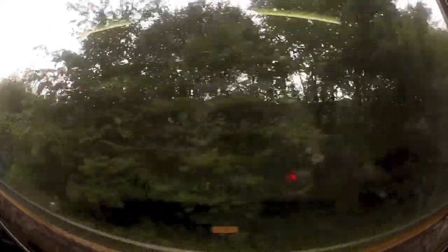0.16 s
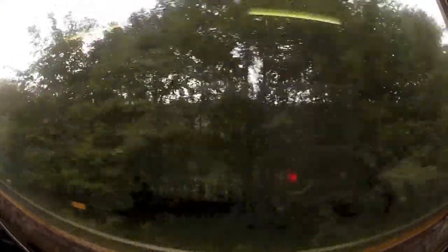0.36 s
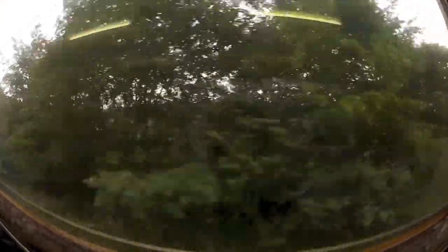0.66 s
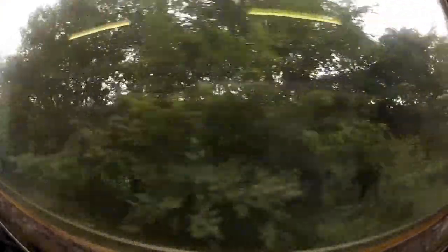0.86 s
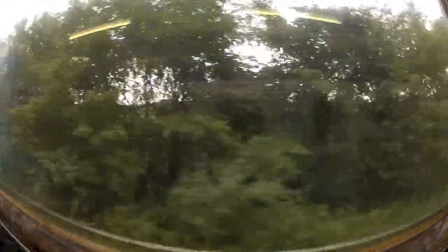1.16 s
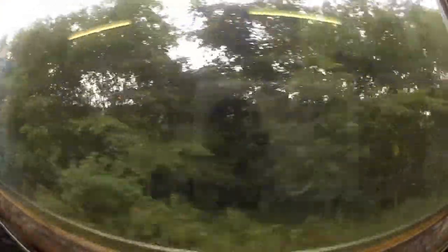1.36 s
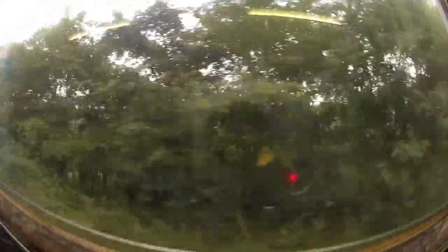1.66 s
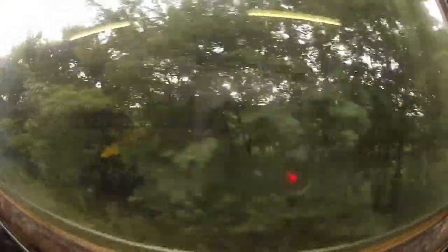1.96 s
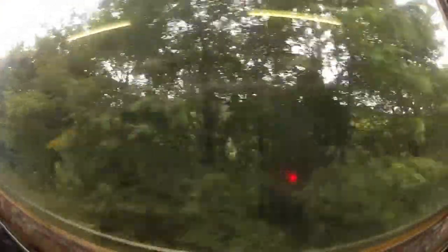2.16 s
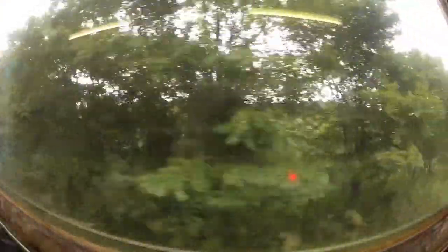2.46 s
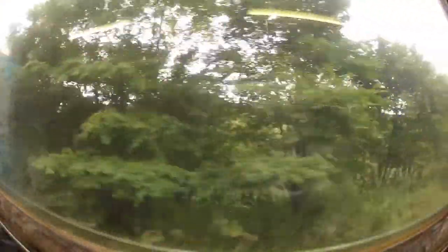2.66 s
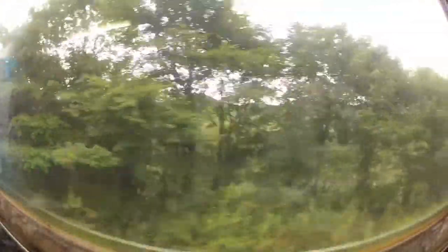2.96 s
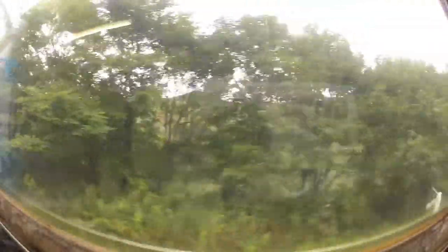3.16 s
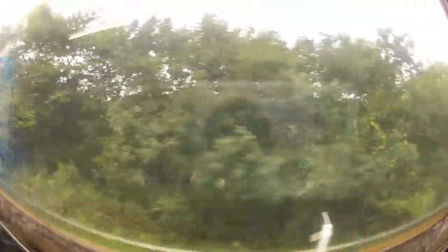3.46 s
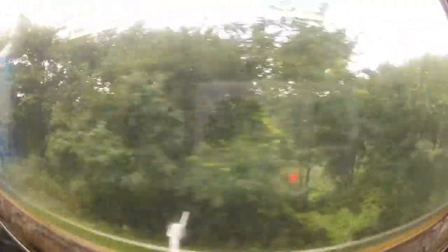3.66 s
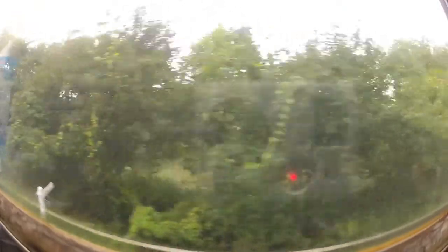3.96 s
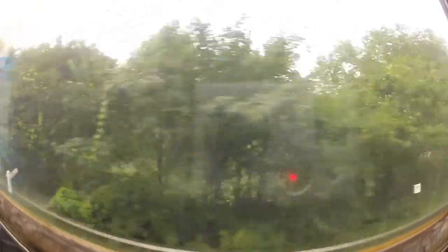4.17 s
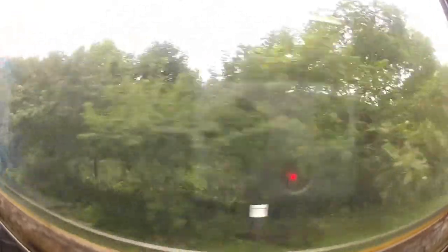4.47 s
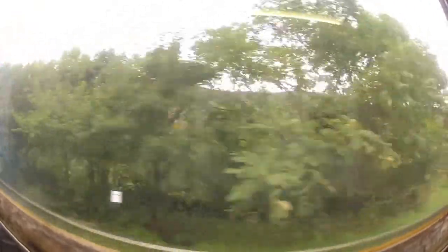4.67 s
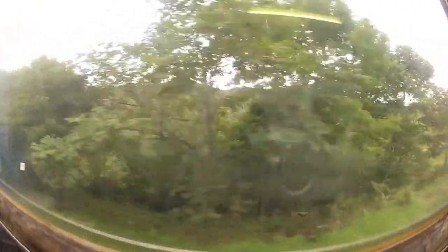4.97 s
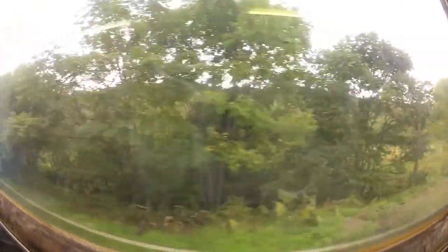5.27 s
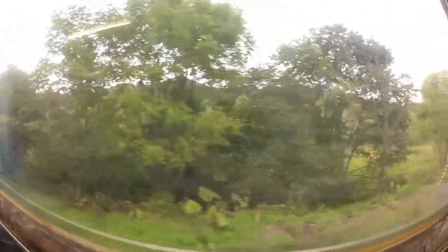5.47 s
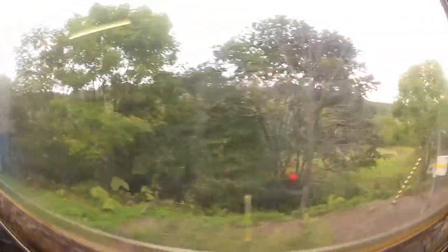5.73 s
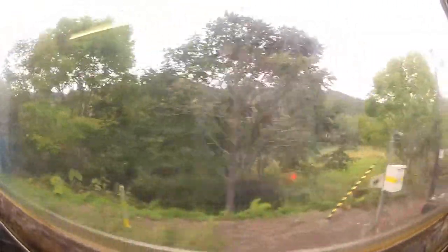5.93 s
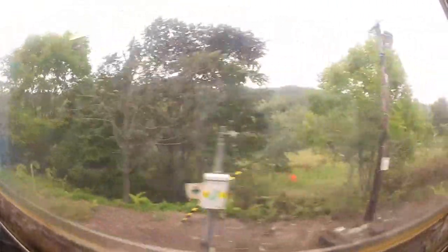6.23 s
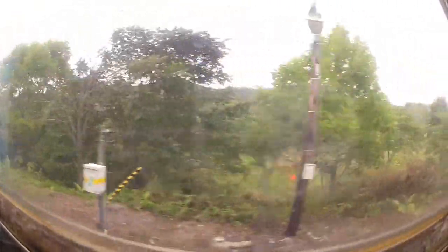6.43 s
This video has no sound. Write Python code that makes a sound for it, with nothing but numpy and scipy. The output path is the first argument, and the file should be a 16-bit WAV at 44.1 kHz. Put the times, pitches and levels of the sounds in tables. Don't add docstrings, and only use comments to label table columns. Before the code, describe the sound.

Inside a slowing diesel railcar, deep wheel rumble booms through the cabin, with humming rails, dull joint thuds and a few small plastic ticks.

```python
import sys
import numpy as np
from scipy import signal
from scipy.fft import rfft, irfft, next_fast_len
from scipy.io import wavfile
from scipy.ndimage import uniform_filter1d

SR = 44100
rng = np.random.default_rng(int(sys.argv[2]) if len(sys.argv) > 2 else 0)


def wav_record(signal):
    frames = np.transpose(np.atleast_2d(signal))
    bounded = np.clip(frames, -1, 1)
    quanta = np.round(bounded * 32767).astype(np.int16)
    wavfile.write(sys.argv[1], SR, quanta)


def volts_from_decibels(level):
    exponent = np.asarray(level, float) / 20
    return 10 ** exponent


N = 291060
SIZE = next_fast_len(N)
HZ = np.maximum(np.fft.rfftfreq(SIZE, 1 / SR), 1)

PATH_HZ = [50, 105, 450, 2000]
# f/Hz, level/dB per Hz
RUMBLE = [(12, -40.5), (20, -26), (63, -20.5), (129, -9), (206, 2.5), (287, -10.5), (582, -22.5),
          (640, -21), (933, -33), (1100, -35.5), (1240, -38.5), (2340, -49), (3840, -48), (4750, -49.5),
          (5600, -52), (7280, -59.5), (12300, -120)]
# f/Hz, width/Hz, level/dB
TRIM_MODES = [(48, 10, -0.5), (66, 3.6, 3.5), (97, 8.4, -1), (516, 18, 3.5), (628, 11, 1), (1094, 130, 2.5),
              (1584, 74, 2.5), (2830, 690, 2.5)]
# f/Hz, width/Hz, level/dB
AIR_MODES = [(135.5, 11, -9), (152.1, 8.9, -2.5), (169.9, 7, -1)]
# f/Hz, width/Hz, level/dB
PANEL_MODES = [(200.9, 18, -4.5), (216.7, 8.5, -12)]
# f/Hz, width/Hz, level/dB
GLASS_MODES = [(242.5, 21.4, 3.5), (273.6, 24, -6.5), (305.8, 25.3, -3.5)]
# t/s, f/Hz
SPEED = [(0, 126), (1.45, 126.5), (1.9, 116.9), (2.15, 101.5), (2.7, 98.8), (3.05, 91), (3.8, 90.7),
         (4.5, 79.91), (6.6, 66)]
# t/s, level/dB re average
ROUGHNESS = [(0, 1.3), (.3, -0.4), (1.02, 0.4), (1.16, 1.5), (1.4, 0.6), (1.55, -0.5), (2.1, 0.9), (2.8, 0),
             (2.9, 2.7), (3.3, 0.3), (4.2, -1.4), (4.45, 0.5), (4.69, -1.5), (5.02, -0.5), (5.4, -1.4),
             (5.88, -1.2), (6.05, 1.5), (6.6, 1)]
# t/s, peak level/dB, 10 dB fall/s
LURCHES = [(.4, -31, 1.5), (.93, -26, -0.1), (1.22, -29, -0.8), (1.4, -28, -0.5), (1.8, -34, -1.5),
           (2.1, -29, -0.5), (2.5, -33, -1), (2.93, -21, 0.17), (3.08, -24, -0.1), (3.33, -30, 0),
           (3.6, -32, 0.1), (3.92, -26, .1), (4.2, -32, 0.2), (4.57, -32, .06), (4.93, -28, 0.05),
           (5.1, -21.5, -0.03), (5.3, -31, 0.3), (5.79, -29.5, 0.12), (5.98, -23.5, 0.08), (6.39, -28, .15)]
# t/s, peak level/dB, 10 dB fall/s
SHUDDERS = [(0.062, -32, 1.5), (0.271, -31, 0.3), (0.464, -34, 0.9), (0.572, -30.5, 0.133),
            (0.695, -31.0, -0.2), (0.948, -25.5, 0.1), (1.112, -27.5, 0.2), (1.423, -28.5, 0),
            (1.555, -24.0, 0.075), (1.637, -28, 0.2), (1.764, -21.5, 0.15), (1.88, -22.5, 0.23),
            (2.079, -22, 0.27), (2.183, -20, 0.22), (2.361, -22.0, 0.23), (2.526, -24.5, 0.16),
            (2.637, -26.5, 0.27), (3.064, -20, 0.14), (3.266, -25.5, 0.14), (3.519, -25.5, 0.2),
            (3.663, -27, 0.13), (3.932, -31, 0), (4.027, -32.5, 0), (4.298, -31.0, 0.1), (4.575, -32, 0.15),
            (4.79, -30.5, 0.2), (4.919, -29.5, 0.2), (5.068, -24, 0.12), (5.327, -28, 0.15),
            (5.489, -30, 0.122), (5.769, -29.5, 0.05), (5.961, -29.0, 0.2), (6.125, -32, 0.15),
            (6.282, -33.0, 0.127), (6.371, -32.0, 0.3), (6.494, -38, 0.3)]
# t/s, peak level/dB, 10 dB fall/s
ROARS = [(.12, -40, 0.2), (.42, -38, 0.8), (.62, -33.5, 0.15), (.92, -38, .06), (1.16, -34, 0.28),
         (1.38, -31.5, 0.12), (1.49, -43.5, 0.15), (1.57, -35.5, 0.4), (1.79, -34, -0.1), (2.22, -37, -0.6),
         (2.45, -36, 0.65), (2.72, -41, -0.2), (2.95, -37.5, 0.15), (3.3, -40, 0.2), (3.52, -36, .06),
         (3.9, -38, 1), (4.25, -38.5, 0.55), (4.47, -40, 0.14), (4.8, -31.5, 0.03), (5.03, -34, 0.13),
         (5.3, -36, 0.34), (5.79, -35.5, 0.35), (6.01, -44, 0.2), (6.16, -39.5, 0.5), (6.3, -36, -0.1),
         (6.42, -42, 0.6), (6.53, -35, .08)]
# t/s, peak level/dB, 10 dB fall/s
RIPPLES = [
    (1.56, -27, -0.1),
    (1.88, -21, 0.17),
    (2.17, -23.5, 0.26),
    (2.7, -25, -0.2),
    (3.08, -18, 0.1),
    (3.3, -33.5, 0.7),
]
# t/s, peak level/dB, 10 dB fall/s, f/Hz
BOOMS = [(0.04, -13.5, 0.05, 157), (0.11, -14.5, 0.074, 151), (0.212, -14.5, 0.04, 158),
         (0.32, -17.5, 0.1, 155), (0.504, -24, 0, 156), (0.585, -17, 0.15, 156), (0.754, -19, 0.093, 157),
         (0.985, -22, 0.05, 149), (1.104, -12.5, 0.061, 157), (1.317, -4.5, 0.078, 155),
         (1.448, -9.0, 0.058, 155), (1.503, -9.5, 0.061, 154), (1.666, -18.5, 0.04, 150),
         (1.725, -19.5, 0.087, 150), (1.818, -14, 0.02, 157), (1.961, -24, 0.061, 149),
         (2.077, -19, 0.06, 151), (2.131, -18.5, 0.075, 154), (2.333, -17.5, 0.063, 148),
         (2.436, -21, 0.065, 151), (2.514, -23.5, 0.04, 161), (2.632, -22, 0.114, 161),
         (2.832, -25, 0.03, 161), (2.893, -20, 0.04, 156), (3.038, -16, 0.04, 154),
         (3.158, -20.5, 0.06, 152), (3.354, -23.5, 0.05, 155), (3.539, -23.5, 0.08, 146),
         (3.785, -26.5, 0.02, 149), (3.897, -27.5, 0.04, 162), (3.968, -29, 0.145, 158),
         (4.093, -25.5, 0.145, 156), (4.414, -27.5, 0.03, 156), (4.785, -23.0, 0.054, 142),
         (4.865, -24, 0.078, 161), (4.95, -18.5, 0.061, 154), (5.235, -26, 0.04, 159),
         (5.322, -29.0, 0.061, 151), (5.457, -25, 0.05, 154), (5.561, -24.5, 0.064, 150),
         (5.645, -28, 0.061, 158), (5.747, -21.0, 0.054, 165), (5.951, -26.5, 0.049, 155),
         (6.027, -26.5, 0.071, 158), (6.132, -27, 0.04, 161), (6.197, -28.5, 0.079, 163),
         (6.26, -26.5, 0.15, 158), (6.43, -25.5, 0.061, 164), (6.535, -25.5, 0.075, 166)]
# t/s, peak level/dB, 10 dB fall/s, f/Hz
DRONES = [(0.111, -24, 0.2, 206), (0.31, -23.5, 0.103, 201.8), (0.519, -20, 0.06, 210.3),
          (0.63, -18.5, 0.05, 205), (0.875, -19.5, 0.13, 210.1), (1.094, -19.5, 0.13, 206.8),
          (1.243, -19.5, 0.12, 207.1), (1.342, -17.5, 0.16, 203), (1.548, -25.5, 0.14, 204.6),
          (1.662, -25.5, 0.04, 203), (1.754, -22.5, 0.07, 211), (1.911, -21.5, 0.085, 213.1),
          (2.029, -24.0, 0.15, 210), (2.238, -19.5, 0.03, 202), (2.348, -18.5, 0.136, 202),
          (2.578, -20.5, 0.136, 210.3), (2.702, -24, 0.107, 205), (2.891, -21.5, -0.05, 206),
          (3.095, -21, 0.13, 208), (3.299, -21, 0.113, 213.9), (3.496, -21.5, 0.06, 211),
          (3.673, -21.5, 0.105, 204), (3.87, -19, 0.1, 204.9), (3.984, -28, 0, 214),
          (4.074, -23.0, 0.06, 200), (4.267, -23, 0.074, 203), (4.495, -29.5, 0.14, 206),
          (4.562, -29, 0.129, 212), (4.706, -29.5, 0, 209.9), (4.895, -24.5, 0.05, 206),
          (5.012, -28.5, 0.088, 208), (5.198, -26, 0.114, 204), (5.277, -26, 0.092, 206.2),
          (5.357, -23.0, 0.1, 206), (5.705, -16, 0.097, 205), (5.994, -24.5, 0, 209.1),
          (6.241, -26, 0.06, 202.8), (6.333, -26, 0.04, 207), (6.477, -25, 0.05, 204.7)]
# t/s, peak level/dB, 10 dB fall/s
BUZZES = [(0.081, -26, 0.13), (0.154, -33, 0.4), (0.336, -27.5, 0.081), (0.439, -26.5, 0),
          (0.507, -27.5, 0.1), (0.681, -24.5, 0.04), (0.805, -23.5, 0.07), (0.896, -26.5, 0.08),
          (1.059, -23.0, 0.17), (1.248, -24.5, 0.07), (1.328, -23, 0.134), (1.419, -27, 0.072),
          (1.47, -27, 0.15), (1.642, -31.5, 0), (1.781, -27.5, 0), (1.882, -27, 0.04), (2.004, -28.5, 0.2),
          (2.093, -34, 0.084), (2.207, -22, 0.06), (2.443, -25, 0.15), (2.532, -27, 0.1),
          (2.611, -32, 0.04), (2.719, -27.5, 0.061), (2.912, -25.0, 0.07), (3.05, -20, 0.043),
          (3.146, -30.0, 0.1), (3.193, -30, 0.1), (3.385, -26.5, 0.09), (3.584, -26.0, 0.057),
          (3.741, -29.5, 0.14), (3.951, -26, 0.104), (4.134, -28.0, 0.05), (4.251, -32.5, 0.2),
          (4.375, -29.5, 0), (4.451, -31, 0.15), (4.592, -33.0, 0.15), (4.798, -27.5, 0.06),
          (4.975, -19.5, 0.08), (5.094, -29.5, 0.066), (5.228, -30.5, 0.15), (5.351, -32.0, 0.06),
          (5.434, -29, -0.04), (5.586, -23.5, 0.064), (5.773, -21.5, 0.1), (6.006, -25, 0.05),
          (6.206, -29.5, 0.1), (6.379, -32, 0), (6.443, -31, 0), (6.536, -29.5, 0.118)]
# t/s, thud level/dB, rattle level/dB re thud, t60/s, bright rattle level/dB re rattle
JOINTS = [(1.10, -41, -23, 0.14, 1), (1.18, -42.5, -13, 0.7, 5), (1.908, -35, -3.5, 0.099, -5),
          (2.85, -43, -14, 0.38, 0), (3.026, -31.5, -12.5, 0.22, 0), (3.045, -42, -10, 0.12, 2.5),
          (4.488, -24, -18, 0.077, -10), (4.772, -27, -21, 0.42, 1), (4.928, -22, -20.5, 0.37, 2.5),
          (5.556, -20.5, -28.5, 0.38, 1), (5.72, -19, -28, 0.44, 0), (5.921, -29, -19.5, 0.32, -6.5),
          (6.126, -28.5, -20, 0.16, 1)]
# f/Hz, level/dB per Hz
THUD = [(59, -34), (100, -19), (146, -13), (265, -0.5), (408, -3), (523, -11), (579, -17.5), (658, -16.5),
        (900, -28.5), (1170, -58.5), (1980, -120)]
# f/Hz, level/dB per Hz
RATTLE = [(700, -6), (900, -2), (1500, -10), (2200, -11.5), (4500, -13.5), (6000, -19.5)]
# f/Hz, width/Hz, level/dB
RATTLE_MODES = [(1120, 61, 10), (1460, 140, 11.5), (1990, 77, 4.5), (3060, 240, 5.5), (3800, 490, 7.5)]
# t/s, peak level/dB, low mode level/dB re peak, crack level/dB re peak
TICKS = [
    (2.5578, -35.5, -6, -13),
    (2.6290, -36, -14, -17),
    (3.2008, -28.5, -13, -9),
    (3.3248, -38, -5.5, -14),
    (6.1260, -54, 0, 3),
    (6.1588, -31.5, -6, -11),
    (6.2262, -38, -13, -21.5),
]
# f/Hz, level/dB, t60/s
FITTING = [(2790, 6.5, 0.016), (3290, -6, 0.017), (1980, -11, 0.03)]
# f/Hz, level/dB, t60/s
FITTING_LOW = [(1120, 2, .06), (1196, 0, 0.035)]
# f/Hz, level/dB, t60/s
CRACK = [(1600, -1, 0.006), (3750, -7, 0.0032), (4800, -4, 0.004), (5600, 2, 0.0048)]
# t/s, peak level/dB, 10 dB fall/s
MESHES = [(.08, -49, 0.3), (.28, -51, 0.2), (.42, -52.5, 0.5), (.85, -55, 0.5), (2.14, -45.5, 0.4),
          (2.35, -50, .1), (2.58, -49, .1), (2.72, -45.5, 0.2), (2.85, -45.5, 0.2), (3.05, -53, 0),
          (3.3, -46, .12), (3.42, -45, 0.35), (3.62, -48.5, .1), (3.71, -55, .07), (4.02, -51, 0.1),
          (4.33, -57.5, 0.7)]
# t/s, peak level/dB, 10 dB fall/s
OVERTONES = [
    (3.25, -69, .2),
    (3.93, -61, .1),
    (4.06, -56, .1),
    (4.33, -61, .1),
]
# f/Hz, level/dB re the 12 kHz image
TOP_LIMITS = [(12400, -24), (12800, -18.5), (14380, -18.3), (14420, -24.5), (15330, -24.5), (15350, 20)]

# level/dB at full speed, loss/dB per halving of speed, share of rail roughness
SWAY, FLOOR, WALL, WINDOW = (-33, 1.2, .4), (-29, 8.8, .4), (-35.5, 1.6, 0.87), (-47, 2.506, 0.86)
BOOM_BED, PANEL_BED, GLASS_BED = (-30, 10.0, 0.44), (-30, 2.9, 0.58), (-33.5, 3.004, 0.46)
RIPPLE_BED, MESH_BED = (-36.5, 4.0, .1), (-60.5, 2.6, .1)
SILENT_BED = (-90, 0, 0)
FULL_SPEED_HZ = 128
RISE_SHARE = 0.7
BOOM_RAGGED_DB, DRONE_RAGGED_DB = -5.5, -8
BRIGHT_HZ, BRIGHT_LINGER = 2700, 1.47
BUILD_T60_S, CHATTER_S = 0.0055, 0.0027
MESH_HZ, MESH_RISE_HZ_PER_S, OVERTONE_DB = 785, 5.5, -13.5
HOLD = 4


def rolling():
    body = colour(RUMBLE) / (1 + (30 / HZ) ** 4) * bumps(TRIM_MODES)
    notch = 1 - 0.77 * np.exp(-((HZ - 228) / 98) ** 6)
    levels = [layer(SWAY, LURCHES), layer(FLOOR, SHUDDERS), layer(WALL, ROARS), layer(WINDOW)]
    out = 0
    for k, level in enumerate(levels):
        share = np.interp(np.log(HZ), np.log(PATH_HZ), np.eye(len(PATH_HZ))[k])
        path = steadied(coloured(body * notch * share ** 1.36), span_s=0.095, share=1.0)
        flicker = volts_from_decibels(0.5 * drift(13))
        out = out + level * flicker * path
    return out


def corrugation():
    hz, = in_time(SPEED)
    phase = 2 * np.pi * np.cumsum(hz + 2.37 * drift(12)) / SR
    return np.sqrt(2) * layer(RIPPLE_BED, RIPPLES) * volts_from_decibels(2.0 * drift(9.6)) * np.sin(phase)


def cabin():
    booms = [(s, db + BOOM_RAGGED_DB, fall_s) for s, db, fall_s, _ in BOOMS]
    drones = [(s, db + DRONE_RAGGED_DB, fall_s) for s, db, fall_s, _ in DRONES]
    parts = [(AIR_MODES, layer(BOOM_BED, booms)),
             (PANEL_MODES, layer(PANEL_BED, drones)),
             (GLASS_MODES, layer(GLASS_BED, BUZZES))]
    out = 0
    for modes, level in parts:
        gain = sum(volts_from_decibels(db) / (1 + (2 * (HZ - hz) / width) ** 2) for hz, width, db in modes)
        out = out + level * steadied(coloured(gain), span_s=0.044, share=0.95)
    return out


def singing(swells, wander_hz):
    hz = in_time(swells)[-1] + wander_hz * drift(25)
    level = layer(SILENT_BED, [(s, db - 1.5, max(fall_s, .02)) for s, db, fall_s, _ in swells])
    return np.sqrt(2) * level * np.sin(2 * np.pi * np.cumsum(hz) / SR)


def joints():
    thud, dull, bright = np.zeros((3, N))
    for s, thud_db, rattle_db, t60, bright_db in JOINTS:
        at = int(s * SR)
        age = np.arange(min(N - at, SR)) / SR
        dying = volts_from_decibels(thud_db - 60 * age / t60)
        thud[at:at + SR] += volts_from_decibels(2.0) * dying * (1 - np.exp(-age / 0.0074))
        rattle = volts_from_decibels(rattle_db + 5.5) * dying * (1 - np.exp(-age / 0.0083))
        dull[at:at + SR] += rattle
        linger_db = 60 * age / t60 * (1 - 1 / BRIGHT_LINGER)
        bright[at:at + SR] += volts_from_decibels(bright_db - 2.5 + linger_db) * rattle
    trim = rms_one(coloured(colour(RATTLE) * bumps(RATTLE_MODES)))
    highpass = signal.butter(2, BRIGHT_HZ, "high", fs=SR, output="sos")
    top = signal.sosfiltfilt(highpass, trim)
    grit = volts_from_decibels(1.5 * drift(200))
    floor = steadied(coloured(colour(THUD)), span_s=0.011, share=0.93)
    return thud * floor + grit * (dull * (trim - top) + bright * top)


def ticks():
    s, peak_db, low_db, crack_db = np.transpose(TICKS)
    at = np.round(s * SR).astype(int)
    out = np.zeros(N)
    for modes, level_db in [(FITTING, peak_db), (FITTING_LOW, peak_db + low_db)]:
        clicks = np.zeros(N)
        clicks[at] = volts_from_decibels(level_db + 3.0)
        for hz, db, t60 in modes:
            out += volts_from_decibels(db) * (ring(clicks, hz, t60) - ring(clicks, hz, BUILD_T60_S))
    clicks = np.zeros(N)
    clicks[at] = volts_from_decibels(peak_db + crack_db - 6)
    contact = signal.lfilter([1], [1, -np.exp(-1 / (CHATTER_S * SR))], clicks + 1e-18)
    chatter = contact * rng.standard_normal(N)
    return out + sum(volts_from_decibels(db) * ring(chatter, hz, t60) for hz, db, t60 in CRACK)


def whine():
    hz = MESH_HZ + MESH_RISE_HZ_PER_S * np.arange(N) / SR
    phase = 2 * np.pi * np.cumsum(hz + 4 * drift(60) + 2.5 * drift(6)) / SR
    flutter = volts_from_decibels(2 * drift(45))
    second = volts_from_decibels(OVERTONE_DB) * layer(MESH_BED) + layer(SILENT_BED, OVERTONES)
    return flutter * (layer(MESH_BED, MESHES) * np.sin(phase) + second * np.sin(2 * phase))


def layer(bed, swells=()):
    full_db, loss_db, share = bed
    t = np.arange(0, N + 64, 64) / SR
    speed_hz = np.interp(t, *np.transpose(SPEED))
    rough_db = np.interp(t, *np.transpose(ROUGHNESS))
    power = volts_from_decibels(full_db + loss_db * np.log2(speed_hz / FULL_SPEED_HZ) + share * rough_db) ** 2
    for s, peak_db, fall_s in swells:
        age = (t - s) / (fall_s + 1e-6)
        power = power + volts_from_decibels(peak_db - 10 * np.where(age < 0, -age / RISE_SHARE, age)) ** 2
    return np.interp(np.arange(N) / SR, t, np.sqrt(power))


def rms_one(x):
    return x / np.sqrt(np.mean(x ** 2) + 1e-20)


def in_time(rows):
    s, *columns = np.transpose(rows)
    return [np.interp(np.arange(N) / SR, s, c) for c in columns]


def coloured(gain):
    return irfft(rfft(rng.standard_normal(SIZE)) * gain, SIZE)[:N]


def colour(points):
    hz, db = np.transpose(points)
    return volts_from_decibels(np.interp(np.log(HZ), np.log(hz), db, left=-70, right=-90))


def bumps(modes):
    return volts_from_decibels(sum(db / (1 + (2 * (HZ - hz) / width) ** 2) for hz, width, db in modes))


def drift(rate):
    slow = uniform_filter1d(rng.standard_normal(int(N / SR * rate) + 4), size=2)
    return np.interp(np.arange(N) / SR * rate, np.arange(len(slow)), rms_one(slow))


def steadied(x, span_s, share):
    span = int(span_s * SR)
    power = uniform_filter1d(uniform_filter1d(x ** 2, span), span)
    return rms_one(x / (power + 1e-9) ** (np.clip(share, 0, 1) / 2))


def ring(clicks, hz, t60):
    r = volts_from_decibels(-60 / (t60 * SR))
    w = 2 * np.pi * hz / SR
    return signal.lfilter([0, np.sin(w)], [1, -2 * r * np.cos(w), r * r], clicks + 1e-18)


def scene():
    rail = rolling() + corrugation()
    body = cabin() + singing(BOOMS, wander_hz=8.0) + singing(DRONES, wander_hz=4.01)
    return (rail + body + joints() + ticks() + whine())[None]


def top_gated(x):
    hz, _, cells = signal.stft(x, SR, nperseg=2048, noverlap=1024)
    power = np.abs(cells) ** 2
    image = power[(hz > 11500) & (hz < 12500)].mean(axis=0)
    image = uniform_filter1d(image, size=3)
    margin = volts_from_decibels(2 * np.interp(hz, *np.transpose(TOP_LIMITS), left=-200))
    patches = uniform_filter1d(power, size=14, axis=0)
    kept = cells * (patches > margin[:, None] * image)
    return signal.istft(kept, SR, nperseg=2048, noverlap=1024)[1][:N]


def band_limit(x):
    return signal.sosfilt(signal.butter(12, 15470, fs=SR, output="sos"), x)


def record(dry):
    x = dry / (1 + np.abs(dry / 1.02) ** 12) ** (1 / 12)
    x = signal.sosfilt(signal.butter(8, 5300, fs=SR, output="sos"), x)
    x = signal.resample_poly(x, 40, 147, axis=1, padtype="edge")
    held = np.repeat(x, HOLD, axis=1)
    x = signal.resample_poly(held, 147, 160, axis=1, padtype="edge")[:, :N]
    mix = top_gated(x[0])[None]
    return band_limit(mix)


dry = scene()
out = record(dry)
wav_record(out)
```